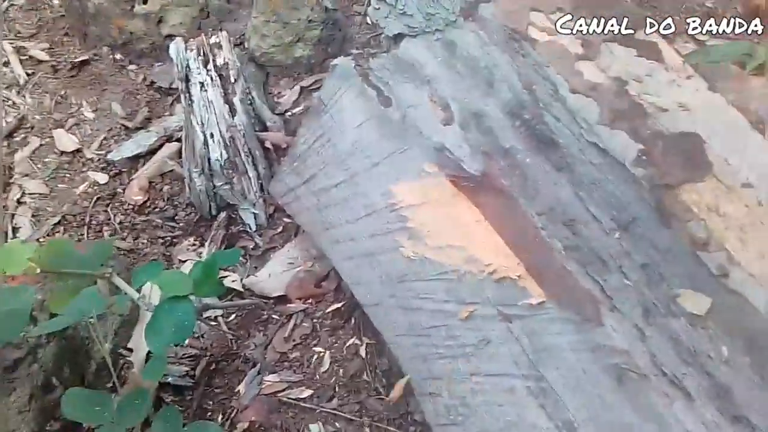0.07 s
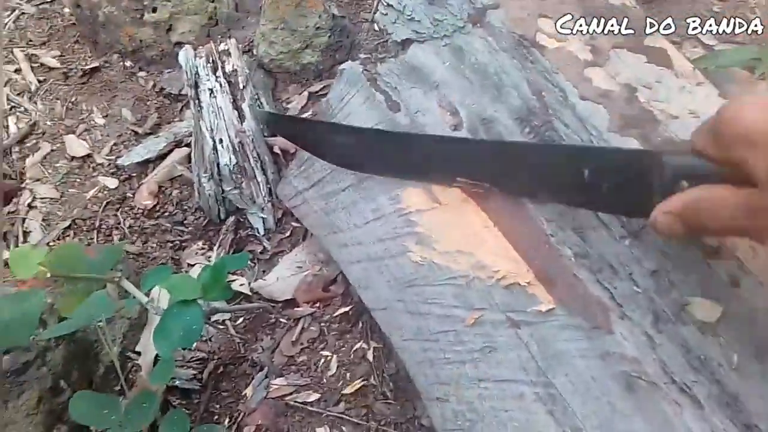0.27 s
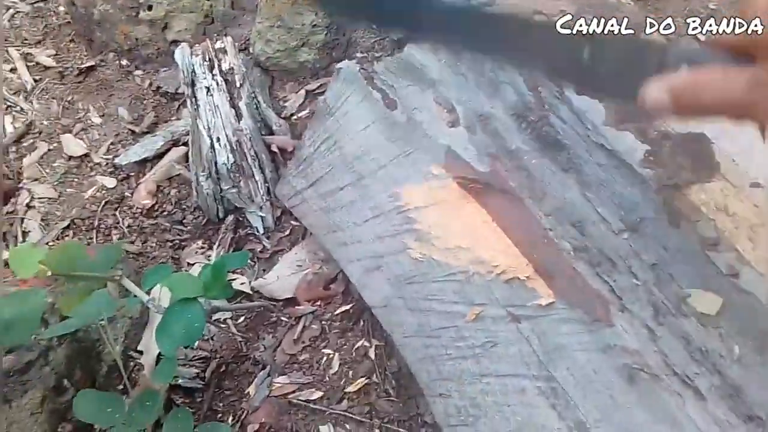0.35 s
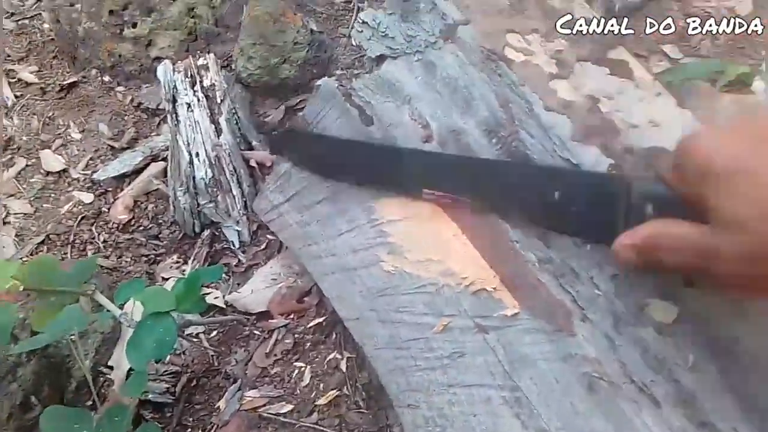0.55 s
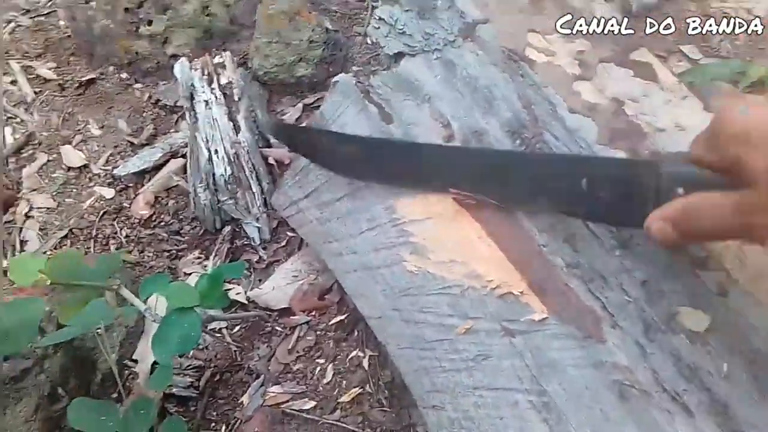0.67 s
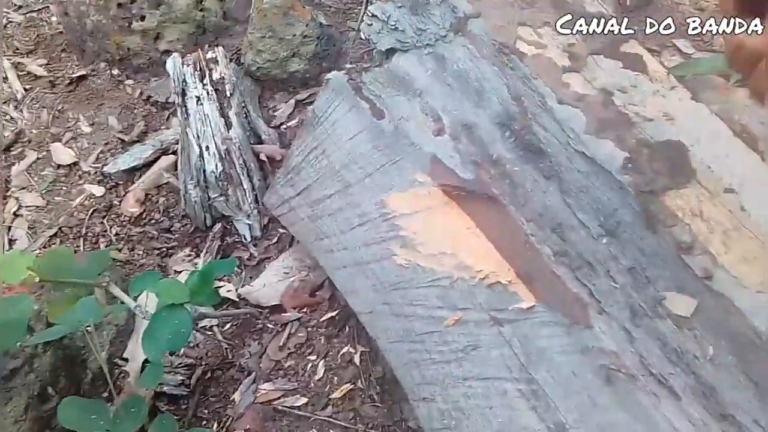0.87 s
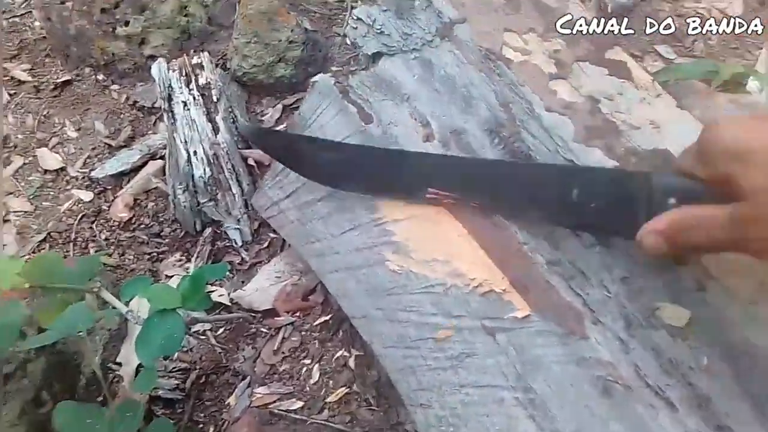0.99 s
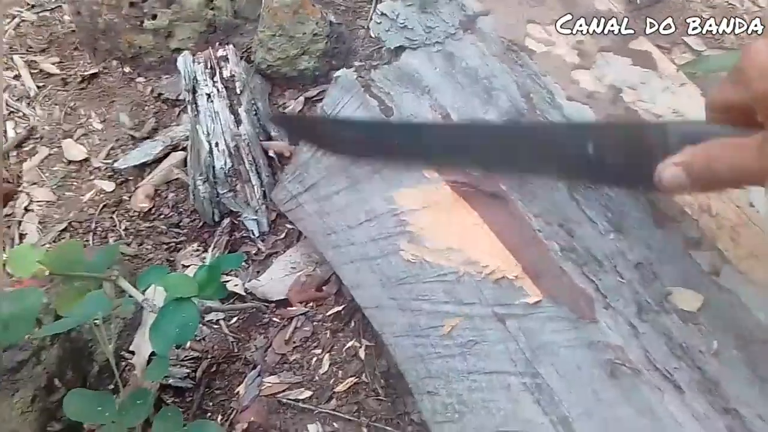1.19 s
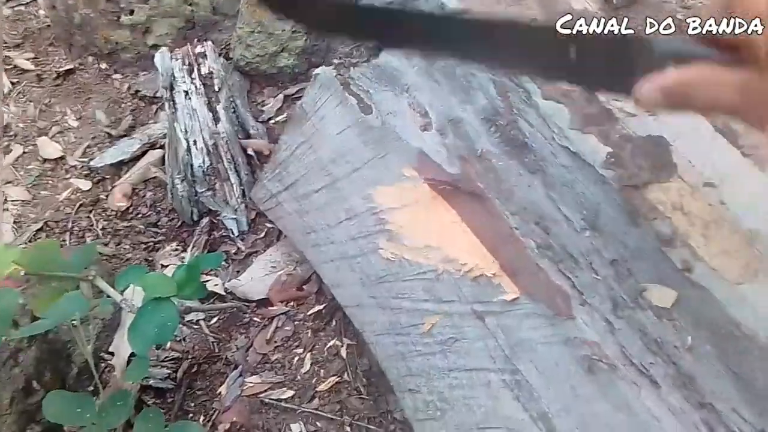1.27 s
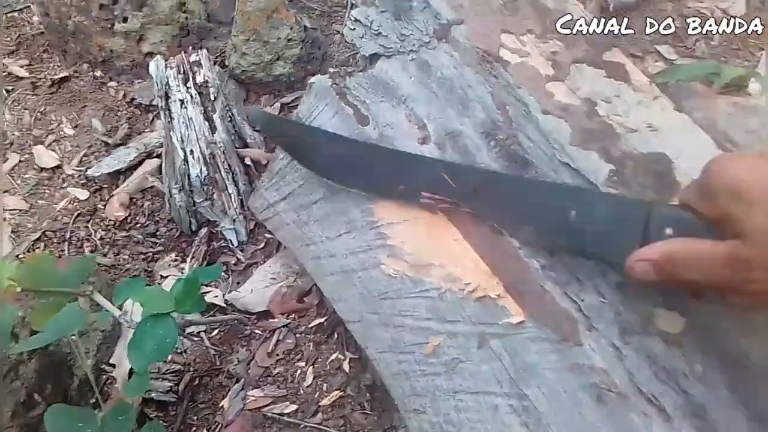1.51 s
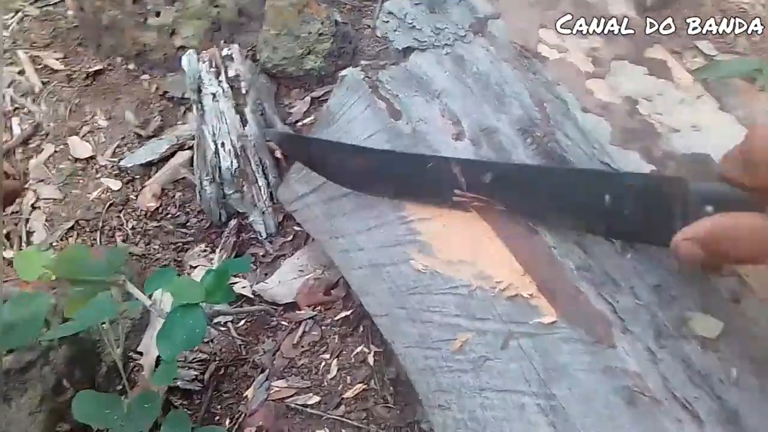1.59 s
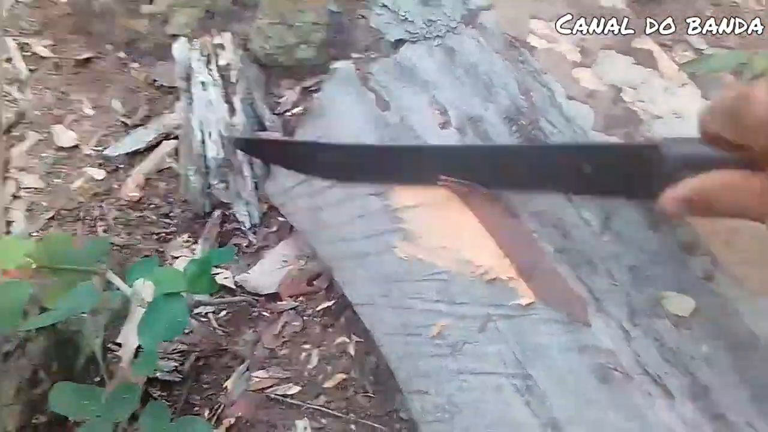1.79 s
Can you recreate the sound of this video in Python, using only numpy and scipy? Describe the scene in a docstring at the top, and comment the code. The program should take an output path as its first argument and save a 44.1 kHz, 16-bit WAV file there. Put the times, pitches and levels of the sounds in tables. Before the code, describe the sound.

A machete chops a hard log four times, close by, at about 0.2, 0.6, 1.0 and 1.6 seconds. Each blow is a splintering crack with a wooden thud and a short metallic ring, slightly overloading the microphone; the third cracks less sharply. Chips tick faintly on the ground between blows, and soft bumps come near 1.2 and 1.8 seconds as the blade lifts. The outdoor background is quiet.

```python
"""Machete chopping a hard log

Four blows, outdoors and close by. Each is a crack of splitting fibres, a thud of the log and a
short ring of the blade, with a dull rumble and a faint wash from the surroundings. Chips tick on
the ground and soft bumps follow as the blade is lifted. The blows overload the microphone."""
import sys
import numpy as np
from scipy import signal
from scipy.fft import rfft, irfft, next_fast_len
from scipy.io import wavfile
from scipy.ndimage import uniform_filter1d

SR = 44100
rng = np.random.default_rng(int(sys.argv[2]) if len(sys.argv) > 2 else 0)


def store_pcm(level_fs):
    """Save levels as 16-bit WAV."""
    pcm = np.round(np.clip(level_fs, -1, 1) * 32767).astype(np.int16)
    wavfile.write(sys.argv[1], SR, np.atleast_2d(pcm).T)


N = 81585
TIME_S = np.arange(N) / SR
SHARP_RISE_S, SOFT_RISE_S = 0.0001, 0.0012


def from_db(db):
    """Decibels to gain."""
    return 10 ** (np.asarray(db) / 20)


def decay(start_s, t60_s, rise_s):
    """An envelope that rises from its start and dies away."""
    age_s = np.maximum(TIME_S - start_s, 0)
    return (1 - np.exp(-age_s / rise_s)) * from_db(-60 * np.minimum(age_s / t60_s, 5))


def ring(start_s, hz, t60_s, rise_s=SOFT_RISE_S):
    """One struck mode."""
    return decay(start_s, t60_s, rise_s) * np.sin(2 * np.pi * hz * (TIME_S - start_s))


def swing(centre_s, hz, width_s, sag_per_s=0):
    """A heavily damped swing of two or three cycles, optionally sinking in pitch."""
    age_s = TIME_S - centre_s
    bell = np.exp(-0.5 * np.minimum((age_s / width_s) ** 2, 100))
    return bell * np.cos(2 * np.pi * hz * age_s * (1 - sag_per_s * age_s / 2))


def noise(spectrum, tilt_db_per_decade=0):
    """Noise of rms 1, coloured by (Hz, dB) points."""
    size = next_fast_len(N)
    hz = np.maximum(np.arange(size // 2 + 1) * SR / size, 1)
    points_hz, points_db = np.transpose(spectrum)
    shape_db = np.interp(np.log(hz), np.log(points_hz), points_db) + tilt_db_per_decade * np.log10(hz)
    coloured = irfft(rfft(rng.standard_normal(size)) * from_db(shape_db), size)[:N]
    return coloured / coloured.std()


# Each row: frequency in Hz, relative density in dB.
AIR_SPECTRUM = [(15, -68.5), (25, -25.5), (229, -7), (270, -9.5), (317, -9), (451, -12), (863, -17.5),
                (1610, -20), (2160, -20.5), (14800, -34), (16000, -43)]
# Each row: time in seconds, level in dB.
AIR_LEVELS = [(0, -64.5), (.5, -62.5), (.9, -65), (1.15, -60.5), (1.5, -60.5), (1.85, -62)]


def outdoor_air():
    """A quiet background that drifts in level."""
    level_db = np.interp(TIME_S, *np.transpose(AIR_LEVELS))
    return from_db(level_db) * noise(AIR_SPECTRUM)


# Each row: start in seconds, level in dB, t60 in seconds, centre in Hz, width in octaves.
CHIP_TICKS = [(.271, -47.5, 0.09, 2470, 0.87), (0.382, -46.5, 0.046, 900, 1.2),
              (0.3918, -44, 0.014, 5050, 0.72), (0.547, -44.5, 0.014, 3650, 1.4),
              (0.565, -52.5, .03, 2180, 1.1), (.677, -37.5, 0.032, 2310, 0.82),
              (0.81, -50.5, 0.027, 3040, 1.5), (1.256, -48, 0.052, 3600, 1.04),
              (1.266, -53, 0.049, 4200, 2.2), (1.327, -55.5, 0.034, 4000, 0.97),
              (1.497, -58.5, 0.014, 2300, .8), (1.7621, -48, 0.034, 1496, 1.04)]


def chips(skirt_db=-30):
    """Chips land and skitter: dry ticks, each around its own pitch."""
    out = np.zeros(N)
    for start_s, db, t60_s, hz, octaves in CHIP_TICKS:
        band = [(hz / 8 ** octaves, skirt_db), (hz, 0), (hz * 8 ** octaves, skirt_db)]
        out += from_db(db) * decay(start_s, t60_s, rise_s=0.001) * noise(band)
    return out


# Each row: time in seconds, level in dB.
LIFT_BUMPS = [(0.309, -68), (0.411, -50.5), (0.837, -49.5), (1.207, -33), (1.794, -33)]


def bumps(tail_db=-0.5):
    """Dull knocks with a short low tail as the blade is lifted."""
    out = np.zeros(N)
    for time_s, db in LIFT_BUMPS:
        knock = swing(time_s, hz=216, width_s=0.002)
        tail = from_db(tail_db) * ring(time_s, hz=129, t60_s=0.041, rise_s=SHARP_RISE_S)
        out += from_db(db) * (tail - knock)
    return out


# Each row: frequency in Hz, relative density in dB.
WASH_SPECTRUM = [(100, -5.5), (350, 5.5), (900, -13.5), (1700, -4.5), (4200, 1), (6500, -5), (10000, -9.5),
                 (15500, -24.5)]


def wash(start_s, db):
    """Trees and ground scatter a blow back."""
    return from_db(db) * decay(start_s, t60_s=0.32, rise_s=0.02) * noise(WASH_SPECTRUM)


# Each row: frequency in Hz, relative density in dB.
RUMBLE_SPECTRUM = [(30, -15.5), (90, 2), (200, -0.5), (480, -3.5), (620, -24), (2000, -44)]


def rumble(start_s, db=-40.5):
    """Log and ground rumble after a blow."""
    return from_db(db) * decay(start_s, t60_s=0.28, rise_s=SOFT_RISE_S) * noise(RUMBLE_SPECTRUM)


# Each row: frequency in Hz, relative level in dB, t60 in seconds.
LOG_RESONANCES = [(208.5, -23.5, .045), (266, -21.5, .045), (450, -16, 0.015), (502, -17.5, 0.11)]


def log_thud(start_s, db, hz, delay_s, width_s, ring_db, low_cut_hz=120):
    """The log gives, its pitch falling as the blade slows, then rings briefly."""
    thud = from_db(db) * swing(start_s + delay_s, hz, width_s, sag_per_s=77)
    body = sum(from_db(ring_db + mode_db) * ring(start_s, mode_hz, t60_s)
               for mode_hz, mode_db, t60_s in LOG_RESONANCES)
    low_cut = signal.butter(2, low_cut_hz, "high", fs=SR, output="sos")
    return signal.sosfilt(low_cut, thud + body)


# Each row: frequency in Hz, relative level in dB, t60 in seconds.
CLANK_MODES = [(1210, -11.5, 0.042), (1485.6, -4, .05), (1956, -7, 0.045), (2122, -5.5, 0.037),
               (2298, -0.5, 0.032), (2593, -2, 0.026), (2977, -2, .04), (3307, 0, .045), (3388, -1, 0.027),
               (3796, 6, 0.025), (3950, -18, 0.064), (4458, 5, 0.021), (4900, 1.5, 0.028),
               (5290, -9, 0.045), (6750, -10, .028), (8830, -1, .025), (10100, -9.5, .025),
               (9200, -26, 0.064), (11920, -10.5, 0.016)]


def blade(start_s, clank_db, low_db, mid_db, mid_t60_s, high_db, high_t60_s, waver_period_s):
    """Damped modes clank, varying with the bite; three ring freely, the highest wavering."""
    spread_db, waver_depth = 3.5, 0.8
    clank = np.zeros(N)
    for hz, db, t60_s in CLANK_MODES:
        gain = rng.choice([-1, 1]) * from_db(clank_db + db + spread_db * rng.normal())
        clank += gain * ring(start_s, hz, t60_s, SHARP_RISE_S)
    low = from_db(low_db) * ring(start_s, hz=772, t60_s=0.13)
    mid = from_db(mid_db) * ring(start_s, hz=1608, t60_s=mid_t60_s)
    high = from_db(high_db) * ring(start_s, hz=7646, t60_s=high_t60_s, rise_s=SHARP_RISE_S)
    waver = 1 - waver_depth * np.cos(np.pi * (TIME_S - start_s) / waver_period_s) ** 2
    return clank + low + mid + waver * high


# Each row: frequency in Hz, relative density in dB.
CRACK_SPECTRUM = [(30, -11), (120, -12.5), (470, -1.5), (660, -19.5), (1000, -11), (2200, -8.5), (3600, -3),
                  (5000, -6), (6300, -11.5), (9000, -10.5), (13000, -15), (16000, -26.5)]


def crack(start_s, db, t60_s, tilt_db_per_decade=0, grain_db=5, snap_hz=5500):
    """Fibres split in a quick, uneven run that dulls as it dies."""
    grain = uniform_filter1d(rng.standard_normal(N), size=30)
    split = noise(CRACK_SPECTRUM, tilt_db_per_decade)
    dull = signal.sosfiltfilt(signal.butter(2, snap_hz, fs=SR, output="sos"), split)
    body = dull * decay(start_s, t60_s, SHARP_RISE_S)
    snap = (split - dull) * decay(start_s, 0.75 * t60_s, SHARP_RISE_S)
    return from_db(db + grain_db * grain / grain.std()) * (body + snap)


# Each row: start in seconds, level in dB, t60 in seconds.
SECOND_BITES = [(0.2393, -11, 0.025)]
# Each row: start in seconds; crack level in dB, t60 in seconds, tilt in dB per decade;
# thud level in dB, pitch in Hz, delay and width in seconds; log ring in dB; blade clank in dB,
# low ring in dB, middle ring in dB, its t60 in seconds, high ring in dB, its t60 and
# waver period in seconds; wash in dB.
BLOWS = [(.2338, -8, 0.013, 9, -8, 315.2, 0.0069, 0.002, -13.5, -13.5, -23.5, -5.5, 0.076, -40, 0.51, 0.092, -37.5),
         (0.6458, -5.5, 0.025, -5, -6.5, 444, 0.0046, 0.0021, -15, -21.5, -24, -12, 0.061, -39, .33, 0.17, -41.5),
         (1.0211, -15, .026, 0, -2.5, 373, 0.0036, 0.0014, -15, -23.5, -34, -8, 0.056, -64, 0.66, .12, -48),
         (1.5808, -6.5, 0.02, 5, -13, 345, 0.0056, 0.0024, -10, -17.5, -28, -14.5, 0.063, -22.5, .24, 0.13, -38)]


def chops(splinter_db=-21.5, splinter_t60_s=0.075):
    """Each blow cracks and splinters the wood and rings log and blade; the first bites twice."""
    out = sum(crack(*bite) for bite in SECOND_BITES)
    for blow in BLOWS:
        start_s, crack_db, t60_s, tilt_db_per_decade = blow[:4]
        thud_settings, blade_settings, wash_db = blow[4:9], blow[9:16], blow[16]
        out += crack(start_s, crack_db, t60_s, tilt_db_per_decade)
        out += crack(start_s, crack_db + splinter_db, splinter_t60_s, tilt_db_per_decade)
        out += log_thud(start_s, *thud_settings) + blade(start_s, *blade_settings)
        out += wash(start_s, wash_db) + rumble(start_s)
    return out


def scene():
    """The chopping over a quiet outdoor background, in mono."""
    return (outdoor_air() + chops() + bumps() + chips())[None]


def record(dry, overload=0.7, low_cut_hz=110, high_cut_hz=16500):
    """The microphone flattens the peaks; the deep bass and the top are cut."""
    flattened = dry / (1 + (dry / overload) ** 4) ** 0.25
    low_cut = signal.butter(1, low_cut_hz, "high", fs=SR, output="sos")
    high_cut = signal.cheby2(16, 80, high_cut_hz, fs=SR, output="sos")
    return signal.sosfilt(high_cut, signal.sosfilt(low_cut, flattened))


dry = scene()
out = record(dry)
store_pcm(out)
```